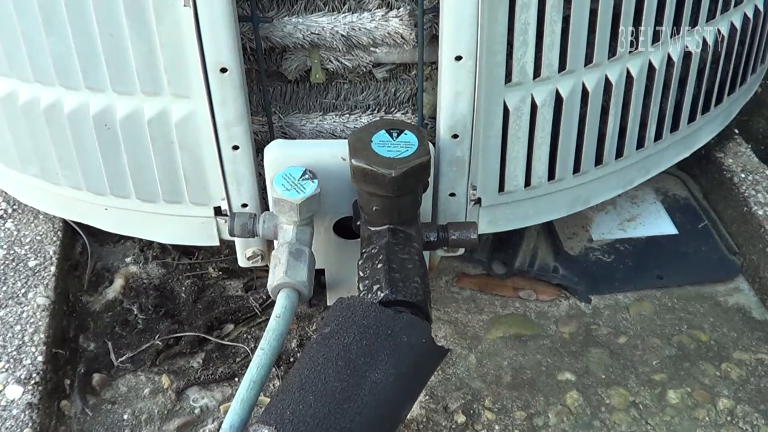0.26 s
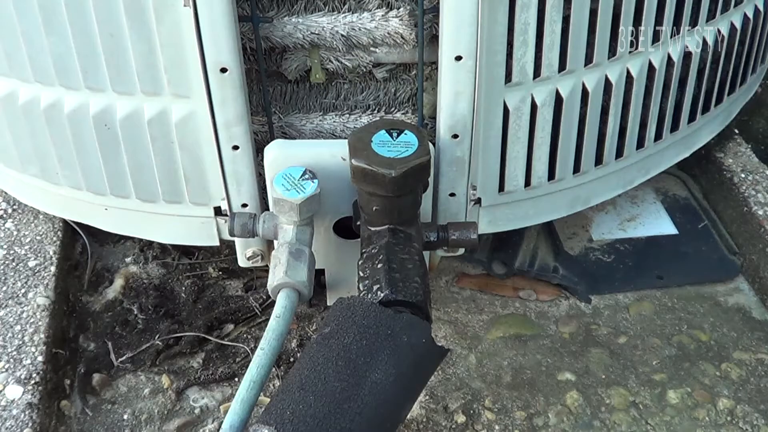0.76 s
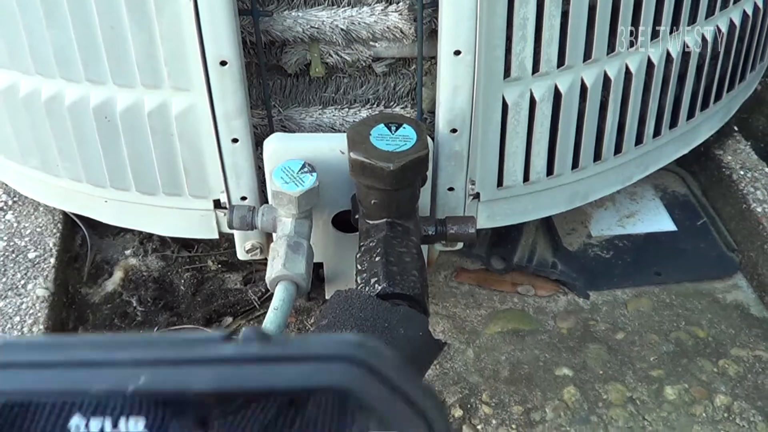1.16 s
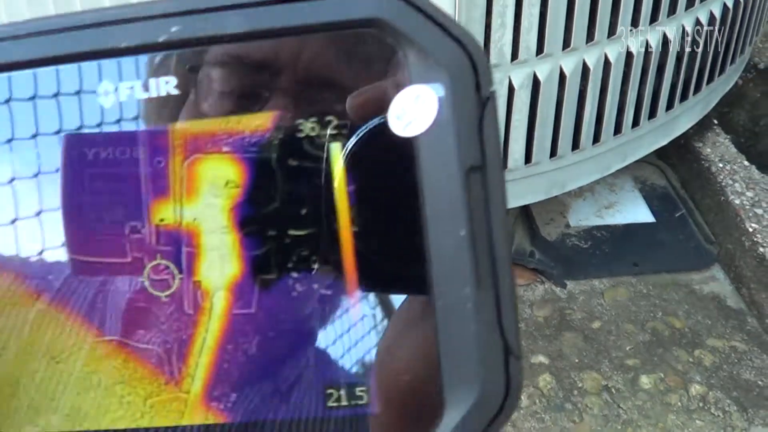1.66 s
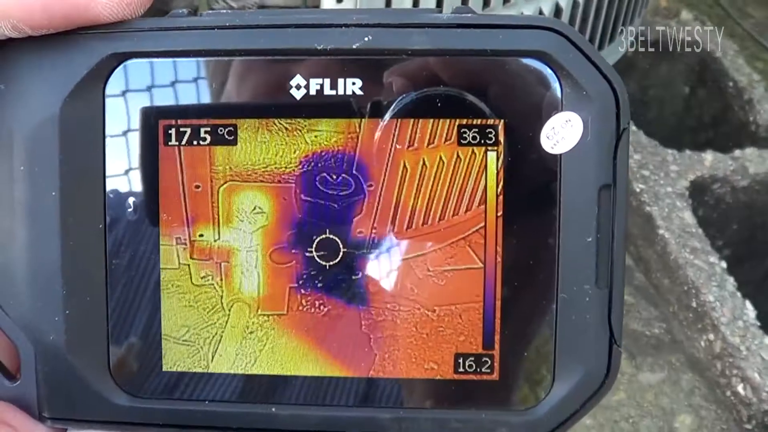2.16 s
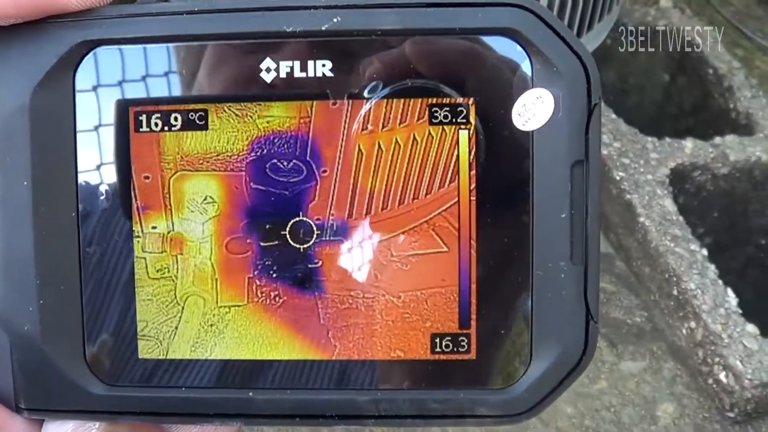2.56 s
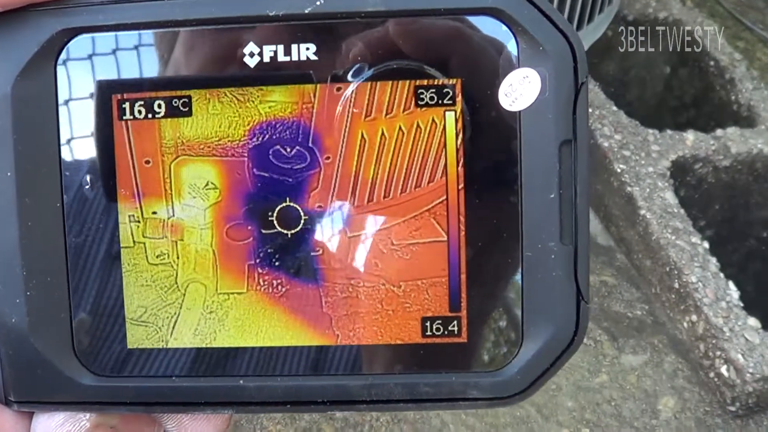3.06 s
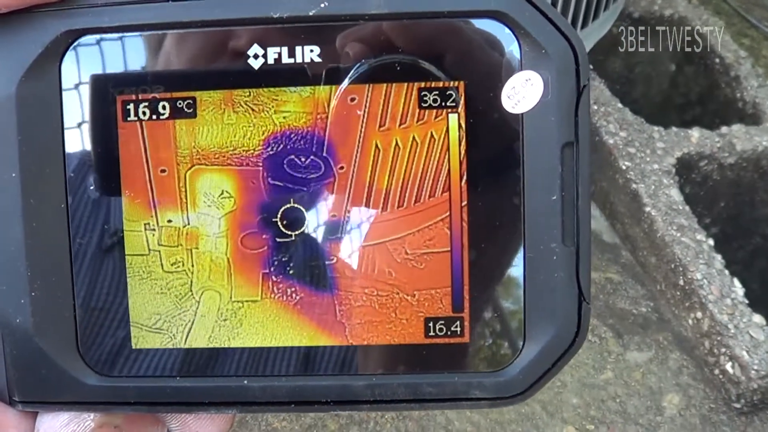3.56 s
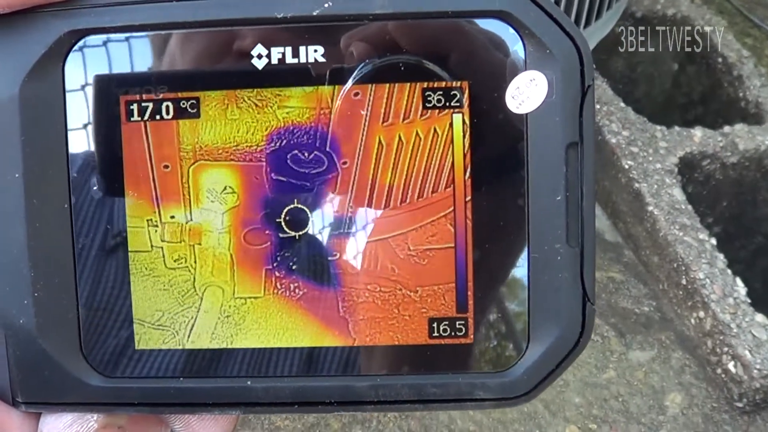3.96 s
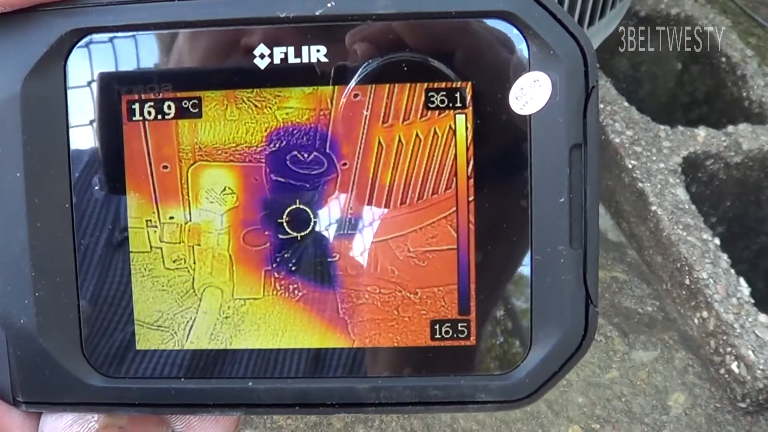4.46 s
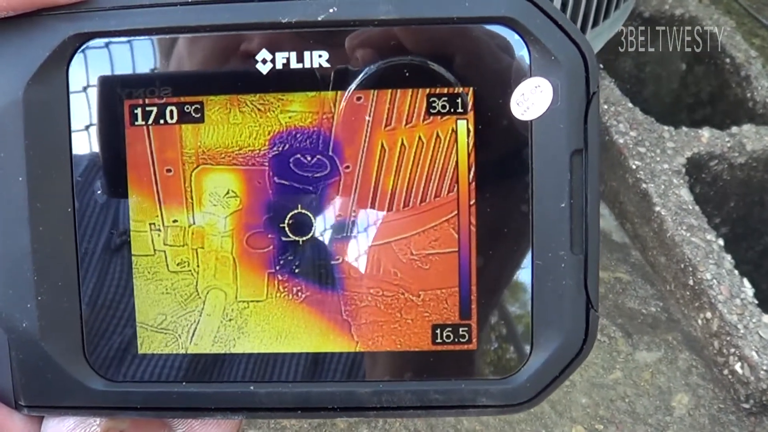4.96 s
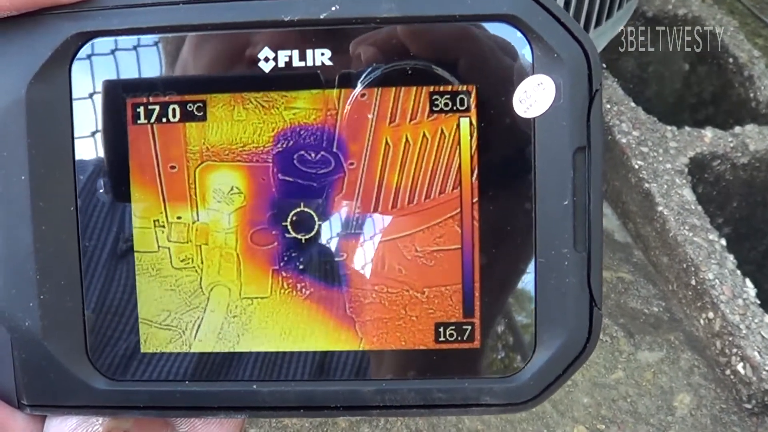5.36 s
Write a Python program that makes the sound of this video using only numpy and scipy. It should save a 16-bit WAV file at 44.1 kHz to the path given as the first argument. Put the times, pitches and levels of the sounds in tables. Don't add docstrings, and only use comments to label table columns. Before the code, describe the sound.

Outdoors, close to a running air-conditioning unit, a hand-held stereo microphone picks up dense rushing air, a wavering mid-pitched fan tone, thin compressor whine and electrical buzz. A very brief first burst cuts to silence; a second stretch has low wind thumps on the microphone; after another short silence the calmer, steady rush continues to the end.

```python
import sys
import numpy as np
from scipy import signal
from scipy.fft import rfft, irfft
from scipy.io import wavfile
from scipy.ndimage import uniform_filter1d

SR = 44100
rng = np.random.default_rng(int(sys.argv[2]) if len(sys.argv) > 2 else 0)


def gain_from_db(level_db):
    decades = np.asarray(level_db, float) / 20
    return 10 ** decades


def put_to_file(sound):
    columns = np.atleast_2d(sound).T
    safe = np.clip(columns, -1, 1)
    whole_steps = np.round(safe * 32767)
    wavfile.write(sys.argv[1], SR, whole_steps.astype(np.int16))


N = 247401
BLOCK = 256
BUZZ_HZ, SHAFT_HZ = 119.995, 58.39
WALL, GROUND = .6, .5
SOUND_M_PER_S = 343
USUAL_TREBLE_DB = -14
GUST_FALL_DB = -15.5

# start_s, end_s, wall_extra_path_m, ground_extra_path_m
SPOTS = [
    (0, .221, .731, .857),
    (.3337, 1.9857, 2.273, 1.391),
    (2.1715, 5.7, 2.186, 1.04),
]
# level_db, arriving_treble_db, leaving_treble_db, steady_draught_db
STREAM = [
    (-18.5, -10.5, -9.5, -38.5),
    (-18.5, -9.5, -11, -44),
    (-18.4, -10.5, -11.5, -56),
]
# peak_s, peak_db, half_length_s
GUSTS = [(.48, -25.5, .16), (.89, -31.5, .07), (1.03, -31, .05), (1.158, -29.5, .07), (1.451, -38, .1),
         (1.62, -23, .05), (1.738, -30, .07), (1.93, -37.5, .08), (2.61, -41, .1)]
# frequency_hz, level_db_per_hz
DRAUGHT = [(15, -47), (25, -26), (43, -10), (118, 2), (209, 1.5), (292, -14.5), (360, -19), (400, -5),
           (520, -37), (880, -120)]
# multiple, level_db
BUZZ = [(14, -47), (20, -49), (50, -53), (51, -47), (52, -48), (53, -45), (54, -49), (56, -45), (57, -49),
        (59, -55), (60, -47), (61, -39), (62, -46), (63, -52), (65, -50), (66, -49), (67, -53), (68, -52),
        (69, -50), (72, -62), (78, -53), (79, -54), (80, -54), (81, -49), (82, -51), (83, -53), (84, -52),
        (86, -52), (87, -53)]
# frequency_hz, level_db
BUZZ_REST = [(2500, -64), (4300, -60), (6500, -57), (9500, -56), (11000, -59), (12500, -68), (13700, -64),
             (15000, -72)]
# multiple, level_db
SHAFT = [(23, -41), (59, -44), (67, -54), (73, -57), (134, -57), (143, -57), (145, -58), (147, -58),
         (151, -58), (155, -53), (156, -57), (160, -56), (161, -57), (165, -50), (166, -48), (167, -55)]
# frequency_hz, level_db
SHAFT_REST = [(3000, -66), (7000, -64), (8000, -61), (10100, -59), (10800, -70), (14000, -85)]
# pitch_hz, level_db, waver_db,
# phase_wander_rad
TONES = [(631.2, -22.5, 2, .55), (649.2, -29.5, 2.5, .7), (613.2, -36, 3, 1.2), (1147.4, -39, 2, .6),
         (1257, -38, 3, 1.6), (1813.3, -40, 2.5, .8), (1845, -41, 3, 1.5), (1920, -43, 3.5, 1.5),
         (2044, -43, 3, 1.5), (3310, -48, 3.5, 1.5), (4439.3, -56, 2, .5)]
# frequency_hz, level_db_per_hz
RUSH = [(25, -37.5), (60, -32), (100, -18), (180, -17), (290, -9), (420, -11), (490, -16), (580, -6.5),
        (1000, -9), (2200, -19), (2550, -25), (9000, -34.5), (11500, -40), (15700, -49)]
# pitch_hz, width_hz,
# boost_db
CABINET = [(630, 68, 2), (680, 112, 6), (757, 45, 5.5), (269, 140, 2.5), (1134, 29, 2.5), (1835, 92, 6.5),
           (1924, 47, 0), (2037, 73, 6), (2205, 140, 5), (3340, 200, 5.5), (3730, 200, 4), (6200, 600, 1),
           (7500, 630, 2.5), (9860, 700, 8.5), (12800, 500, -10), (14400, 400, -8.5), (15400, 500, -9)]
# frequency_hz, likeness_0_to_1
SAME = [(40, .86), (100, 0.94), (290, 1), (440, 0.38), (560, 0.97), (780, 0.91), (900, 0.76), (1800, 0.89),
        (4000, 0.9), (10000, 0.93)]
# frequency_hz, left_minus_right_db
LEAN = [(60, 1), (130, 0.5), (200, 0.5), (440, -2), (600, 1.5), (1800, 0), (3300, -1.5), (7000, -0.5),
        (11000, 1)]
# frequency_hz, lead_rad
LEAD = [(40, .2), (100, 0.25), (860, 0.45), (1800, 0.24), (6000, 0.49), (10000, .05)]


def read(points, hz):
    f, value = np.transpose(points)
    return np.interp(np.log(hz + 1), np.log(f + 1), value)


def evened(x):
    return x / np.sqrt(np.mean(x ** 2) + 1e-20)


def drift(rows, top_hz):
    t = np.arange(N // BLOCK + 2) * BLOCK / SR
    hz = np.geomspace(.3, top_hz, 16)[:, None]
    curves = []
    for phase in rng.random((rows, 16, 1)):
        sines = np.sin(2 * np.pi * (hz * t + phase)) / hz ** 0.31
        curves.append(evened(sines.sum(0)))
    return np.array(curves)


def by_spot(t, arrival, leaving):
    return np.interp(t, np.array(SPOTS)[:, :2].ravel(), np.transpose([arrival, leaving]).ravel())


def echoes(hz, t):
    wall, ground = np.transpose(SPOTS)[2:]
    lift = .042 * np.interp(t, (.75, 1.1), (0, 1)) * (t < SPOTS[2][0])
    radians_per_m = 2 * np.pi * hz[:, None] / SOUND_M_PER_S
    from_wall = WALL * np.exp(1j * radians_per_m * by_spot(t, wall, wall))
    from_ground = GROUND * np.exp(1j * radians_per_m * (by_spot(t, ground, ground) + lift))
    return 10 * np.log10(abs(1 + from_wall + from_ground) ** 2 + .03)


def lines(hz, level_db, waver_db, wander, top_hz, pan_db, lead):
    start = np.arange(N // BLOCK + 2) * BLOCK / SR
    within = np.arange(BLOCK) / BLOCK
    level = np.sqrt(2) * gain_from_db(level_db + waver_db * drift(len(hz), top_hz))
    phase = wander * drift(len(hz), top_hz) + 2 * np.pi * rng.random((len(hz), 1))
    level = level * np.exp(1j * phase)
    turn = np.exp(2j * np.pi * hz[:, None] * start[:-1])
    fine = np.exp(2j * np.pi * hz[:, None] * within * BLOCK / SR)
    pan, lag = rng.standard_normal((len(hz), 2, 1)).transpose(1, 0, 2)
    left = gain_from_db(pan_db[0] + pan_db[1] * pan) * np.exp(1j * (lead[0] + lead[1] * lag))
    ports = np.array([left, left ** 0]) * 2 / abs(1 + left)
    out = []
    for port in ports:
        fading = ((port * turn * level[:, :-1]).T @ fine) * (1 - within)
        rising = ((port * turn * level[:, 1:]).T @ fine) * within
        out.append(fading + rising)
    return np.real(out).reshape(2, -1)[:, :N]


def row(base_hz, multiple, strong, rest, wander):
    hz, table = multiple * base_hz, np.array(strong)
    t = np.arange(N // BLOCK + 2) * BLOCK / SR
    level_db = read(rest, hz) - 3 + 1.8 * rng.standard_normal(len(multiple))
    level_db[np.round(table[:, 0]).astype(int) - multiple[0]] = table[:, 1]
    level_db = level_db[:, None] + echoes(hz, t)
    return lines(hz, level_db, 1.0, wander * multiple[:, None], top_hz=6, pan_db=(2.5, 2.5), lead=(.3, .48))


def draught():
    hz, t = np.fft.rfftfreq(N, 1 / SR), np.arange(N) / SR
    spectrum = rfft(rng.standard_normal(N)) * gain_from_db(read(DRAUGHT, hz)) * (hz < 600)
    push = evened(irfft(spectrum, N))
    steady_db = np.transpose(STREAM)[3]
    strength = gain_from_db(by_spot(t, steady_db, steady_db))
    for peak_s, peak_db, half_s in GUSTS:
        strength = strength + gain_from_db(peak_db + GUST_FALL_DB * abs(t - peak_s) / half_s)
    return strength * push * np.array([[1], [-1]])


def buzz():
    return row(BUZZ_HZ, np.arange(12, 126), BUZZ, BUZZ_REST, wander=.002)


def whine():
    return row(SHAFT_HZ, np.arange(20, 240), SHAFT, SHAFT_REST, wander=.006)


def tones():
    hz, db, waver_db, wander = np.transpose(TONES)[..., None]
    return lines(hz[:, 0], db, waver_db, wander, top_hz=14, pan_db=(1.0, .7), lead=(.45, .1))


def air():
    frames, hz = N // 512 + 6, np.fft.rfftfreq(2048, 1 / SR)
    t = np.arange(frames) * 512 / SR
    a, b, c, d, patches = rng.standard_normal((frames, 1025, 5)).T
    patches = uniform_filter1d(patches, size=24, axis=0)
    patches = evened(uniform_filter1d(patches, size=6, axis=1))
    boost_db = sum(db / (1 + ((hz - f) / (width / 2)) ** 2) for f, width, db in CABINET)

    level_db, arrival_db, leaving_db = np.transpose(STREAM)[:3]
    upper = 1 / (1 + (2500 / (hz + 1)) ** 6)
    treble_db = by_spot(t, arrival_db, leaving_db) - USUAL_TREBLE_DB
    breath_db = 0.81 * drift(1, 10)[0][np.minimum(2 * np.arange(frames), N // BLOCK)]
    tilt_db = upper[:, None] * (treble_db + breath_db)
    tilt_db = tilt_db + (hz > 15100)[:, None] * np.interp(t, (2.5, 2.8), (0, -13))

    same = np.clip(read(SAME, hz), 0, 1)[:, None]
    left = a + 1j * b
    right = same * left + np.sqrt(1 - same ** 2) * (c + 1j * d)
    right = right * np.exp(-1j * read(LEAD, hz))[:, None]
    lean = gain_from_db(read(LEAN, hz) / 2)[:, None]
    colour_db = (read(RUSH, hz) + boost_db)[:, None] + tilt_db + 1.09 * patches
    z = np.array([left * lean, right / lean]) * gain_from_db(colour_db)
    rush = evened(signal.istft(z, nperseg=2048, noverlap=1536)[1][:, :N])

    flutter = evened(uniform_filter1d(rng.standard_normal(N), size=900))
    stream_db = by_spot(np.arange(N) / SR, level_db, level_db)
    return rush * gain_from_db(stream_db + 2.0 + 0.34 * flutter)


def scene():
    return draught() + buzz() + whine() + tones() + air()


def limited(x, over_db, ratio, recover_s):
    power = uniform_filter1d((x ** 2).mean(0), size=130)
    excess_db = np.maximum(10 * np.log10(abs(power) + 1e-12) - over_db, 0) * (1 - 1 / ratio)
    keep = np.exp(-1 / (recover_s * SR))
    return x / gain_from_db(signal.lfilter([1 - keep], [1, -keep], excess_db))


def roll_off(x):
    return signal.sosfilt(signal.butter(12, 15720, fs=SR, output="sos"), x)


def record(dry):
    t = np.arange(N) / SR
    shown = sum(1. * (t >= start) * (t < end) for start, end, *_ in SPOTS)
    edits = uniform_filter1d(shown, size=16)
    kept = gain_from_db(1.5) * limited(dry, over_db=-16.0, ratio=3.8, recover_s=0.0024) * edits
    mid, side = kept.mean(0), (kept[0] - kept[1]) / 2
    side = signal.oaconvolve(side, signal.firwin(127, 11100, fs=SR), "same")
    return roll_off(np.array([mid + side, mid - side]))


dry = scene()
out = record(dry)
put_to_file(out)
```